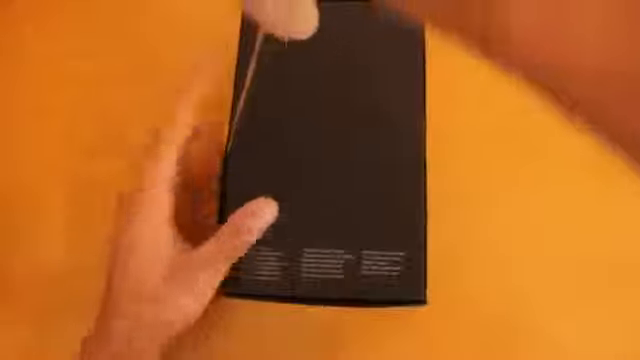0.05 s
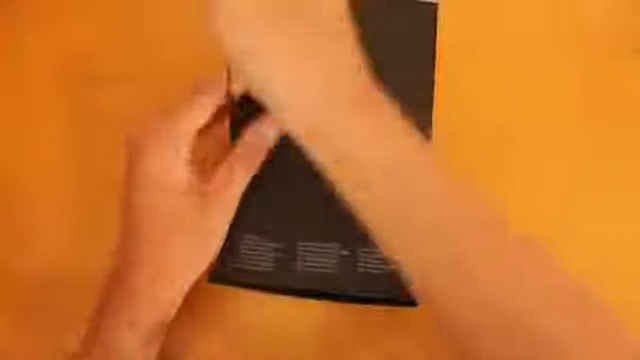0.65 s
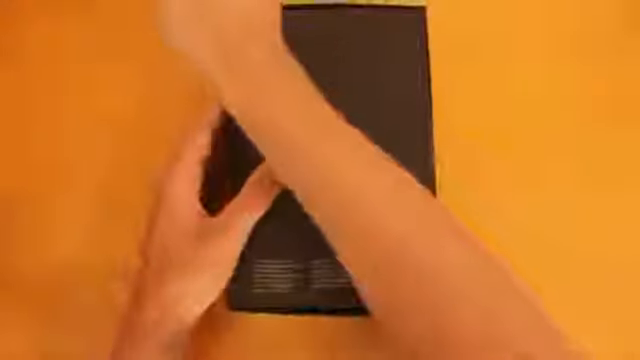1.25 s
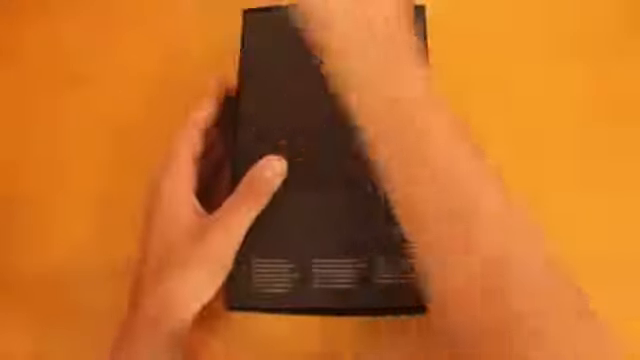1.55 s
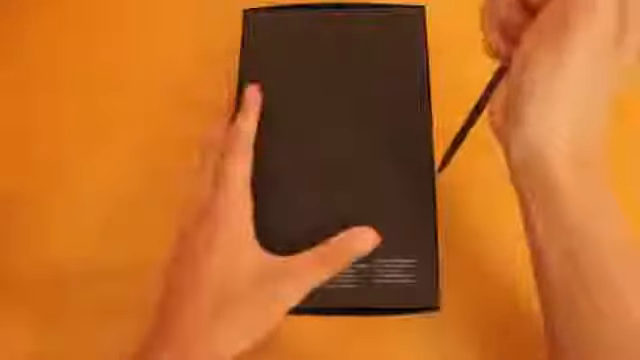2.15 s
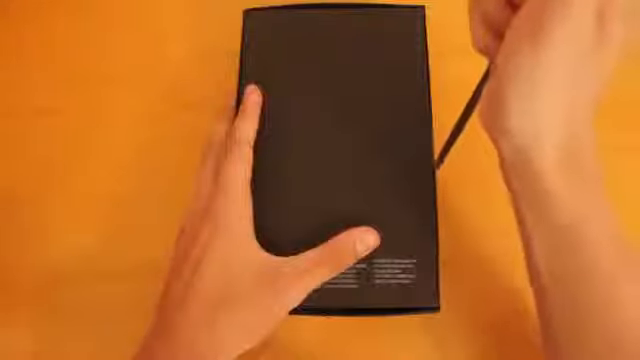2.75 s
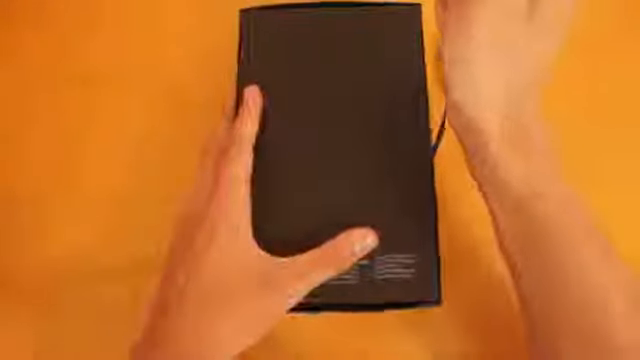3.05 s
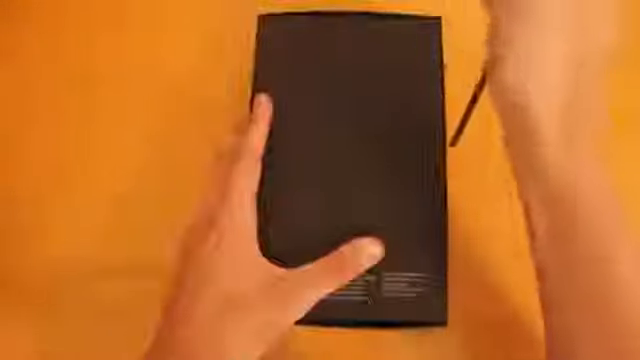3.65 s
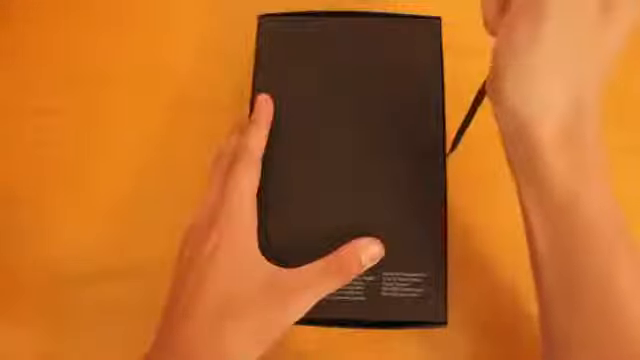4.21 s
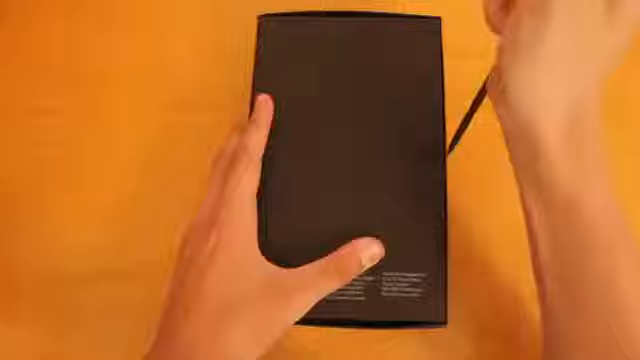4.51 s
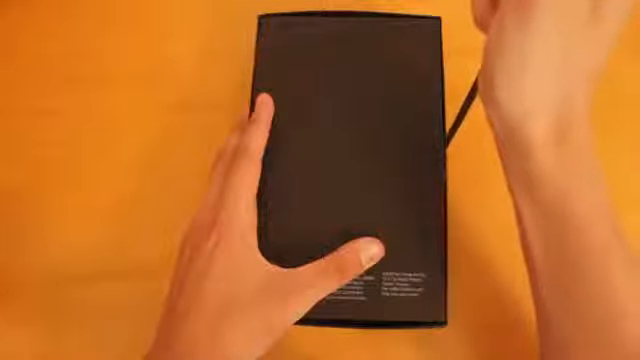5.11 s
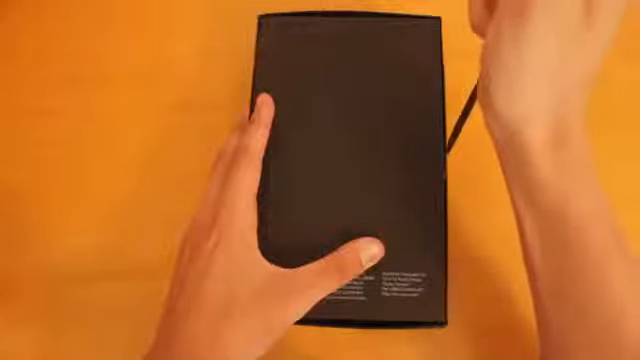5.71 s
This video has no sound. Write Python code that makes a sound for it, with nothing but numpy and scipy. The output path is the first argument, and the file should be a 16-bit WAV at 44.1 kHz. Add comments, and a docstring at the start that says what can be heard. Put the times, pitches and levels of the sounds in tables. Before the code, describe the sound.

A thin blade ticks and scrapes lightly along the tape of a cardboard box from the start, with soft hollow bumps and a low shuffle as hands push the box about. At about 1.3 seconds the taut tape parts with one sharp snap, the loudest sound. More ticks, short grainy scrapes and muffled bumps follow from 1.6 to 2.8 seconds. Around 3.2 seconds the box gives a brief squeak as it sticks and slips on the table. At 3.3 seconds a second strip of tape rips free, dragging the box in quick, thumping hops that die away by about 3.7 seconds. Faint scrapes and small bumps come between 3.9 and 5 seconds, then a last tick and hollow thump near 5.2 seconds. Everything is heard close up in a quiet small room with a short echo.

```python
"""In a quiet small room, a thin blade ticks and scrapes along the tape of a cardboard box.
Hands bump the hollow panels and push the box about, and the taut tape parts with one sharp snap.
Later the box squeaks as it sticks and slips on the table. A second strip of tape rips free and
drags the box along in quick, thumping hops. Two close microphones hear it all, with a short echo."""
import sys
import numpy as np
from scipy import signal
from scipy.fft import rfft, irfft
from scipy.io import wavfile

SR = 44100
rng = np.random.default_rng(int(sys.argv[2]) if len(sys.argv) > 2 else 0)


def transcribe(signal):
    """Save signal, clipped to [-1, 1], as a 16-bit WAV file at the path in sys.argv[1]."""
    frames = np.atleast_2d(signal).T
    limited = np.clip(frames, -1, 1)
    pcm = np.round(limited * 32767).astype(np.int16)
    wavfile.write(sys.argv[1], SR, pcm)


N = 254456
T = np.arange(N) / SR
SNAP_S = 1.2922
PANEL_PAN_DB = -5  # panel thumps are louder on the right


def undb(db):
    """Turn decibels into a gain to multiply by."""
    return 10 ** (np.asarray(db) / 20)


def unit(x):
    """Scale a sound to an average (rms) level of 1."""
    return x / np.sqrt(np.mean(x ** 2))


def fade(t60, size):
    """A gain that dies away by 60 dB in t60 seconds. Tables call this time ring_s."""
    return np.exp(-np.log(1000) * T[:size] / max(t60, 1e-4))


def colour(x, points, size=4096):
    """Shape the tone of a sound with rows of pitch_hz, level_db; white noise keeps its power."""
    hz, db = np.transpose(points)
    grid = np.maximum(np.fft.rfftfreq(size, 1 / SR), 1)
    log_gain = np.log(undb(np.interp(np.log(grid), np.log(hz), db)))
    # build the filter so that it never sounds ahead of its input
    first_half = (np.arange(size) > 0) & (np.arange(size) < size // 2)
    response = irfft(np.exp(rfft(2 * irfft(log_gain) * first_half)))
    return signal.fftconvolve(x, response / np.linalg.norm(response))[:len(x)]


def split(x, hz, order=2):
    """Return the parts of a sound below and above a frequency."""
    return [signal.sosfilt(signal.butter(order, hz, side, fs=SR, output="sos"), x)
            for side in ("low", "high")]


def ring(modes, size=12000):
    """A struck object rings with fading tones, one per row of pitch_hz, level_db, ring_s."""
    return sum(undb(db) * fade(t60, size) * np.sin(2 * np.pi * hz * T[:size]) for hz, db, t60 in modes)


def add(out, s, x, pan_db=0):
    """Mix a sound in at s seconds; pan_db is the left level minus the right."""
    i = max(int(s * SR), 0)
    out[:, i:i + len(x)] += undb(np.array([[pan_db], [-pan_db]]) / 2) * x[:N - i]


def gesture(s, db, rise, fall, hold=0):
    """A gain that peaks at time s, holds and dies away; rise and fall are seconds per 20 dB."""
    before = np.maximum(s - T, 0) / rise
    after = np.maximum(T - s - hold, 0) / fall
    return undb(db - 20 * np.minimum(before + after, 8))


def gestures(rows):
    """The joint gain of overlapping gestures, whose powers add."""
    return np.sqrt(sum(gesture(*row) ** 2 for row in rows))


def crackle(rate, spread_db, hiss):
    """Glue threads or fibres let go: about rate uneven clicks a second, over a smooth rub."""
    strength = undb(spread_db * np.clip(rng.standard_normal(N), -2, 2)) * rng.choice([-1, 1], N)
    clicks = unit(strength * (rng.random(N) < rate / SR))
    return unit(clicks + hiss * rng.standard_normal(N))


def room_air():
    """Quiet room air with a faint wavering hum, and the hiss of each microphone."""
    # tone of the air and hiss: pitch_hz, level_db
    air_tone = [(20, -5.5), (40, -7), (70, -5.5), (110, -2), (160, -7), (240, -6), (330, -10.5),
                (500, -11.5), (800, -17), (1400, -20), (2200, -22.5), (5000, -25.5), (10000, -28),
                (15000, -30)]
    shared, left, right = (colour(rng.standard_normal(N), air_tone) for _ in range(3))
    air = undb(-5.5) * split(shared, 1500, order=1)[0] + undb(-1) * np.array([left, right])
    hum = unit(signal.fftconvolve(rng.standard_normal(N), ring([(241, 0, .4)]))[:N])
    return undb(-63) * air + undb(-75) * hum


def blade_ticks(size=4096):
    """Each catch of the blade is a short crack that knocks the flap, with a crumbling tail."""
    # catches of the blade: start_s, strength_db, treble_db
    catches = [(0.015, -41, 21), (0.081, -33.5, 32.5), (0.378, -23, 11), (0.712, -28, -10.5),
               (0.732, -30, -8), (0.808, -20, -6), (0.822, -23.5, -12), (0.865, -20, 6), (1.196, -25, 6),
               (1.586, -17, 2.5), (1.877, -22.5, 9), (1.909, -28.5, -5), (2.021, -21.5, 9.5),
               (2.105, -23, 3), (2.15, -24, 6), (2.473, -33, -4), (2.729, -25.5, -15), (2.758, -18, -0.5),
               (3.335, -18.5, -16), (3.413, -19.5, -1), (3.472, -17, -11), (4.686, -36, -3),
               (5.239, -26, -8)]
    # tone of a tick: pitch_hz, level_db
    tick_tone = [(120, -36.5), (200, -1.5), (804, -3), (1460, -11), (1910, -12), (2510, -25.5), (2850, -20),
                 (4720, -26), (6190, -26.5), (7970, -31.5), (12500, -32.5), (15000, -40.5)]
    # tones of the stiff flap under the blade: pitch_hz, level_db, ring_s
    flap_tones = [(930, 0, .022), (1230, -5, .016)]
    # the blade's place as it crosses between seams: time_s, left_minus_right_db
    blade_path = [(1.6, -3), (1.85, 0.7)]
    out = np.zeros((2, N))
    flap = ring(flap_tones, size)
    knock = undb(-9.5) * flap / np.linalg.norm(flap)
    for s, db, treble_db in catches:
        crumbs = rng.standard_normal(size) * (fade(0.066, size) + undb(-15.5) * fade(0.14, size))
        crack = undb(-5) * signal.unit_impulse(size) + crumbs / np.linalg.norm(crumbs)
        low, high = split(colour(crack, tick_tone), 2500, order=1)
        tick = low + undb(treble_db) * high * fade(.07, size) + knock  # the treble dies first
        pan_db = np.interp(s, *np.transpose(blade_path))
        add(out, s, undb(db) * tick / np.linalg.norm(tick), pan_db)
    return out


def panel_thump(hz, t60):
    """A pushed panel swings, with a weaker overtone; the air inside swings against it. Peak 1."""
    # tone of the air in the box: pitch_hz, level_db, ring_s
    box_air = [(253.7, -12, 0.1)]
    swing = ring(box_air) - ring([(hz, 0, t60), (hz * 1.7, -14, .038)])
    muffled = split(swing, 420, order=3)[0]
    thump = split(muffled, 69)[1]
    return thump / abs(thump).max()


def hand_bumps():
    """Fingers and blade bump the hollow panels; the pitch depends on the grip."""
    # soft bumps: start_s, peak_db, pitch_hz
    bumps = [(0.016, -43, 119), (0.082, -43.5, 93), (0.34, -52, 141), (0.745, -42, 131.6),
             (0.921, -49, 117), (1.197, -45.5, 254.6), (1.584, -43.5, 241), (1.875, -47.5, 150.3),
             (2.023, -51, 242.4), (2.102, -50, 226), (2.156, -36.5, 111.2), (2.731, -31.5, 127),
             (2.756, -39, 243), (3.191, -38, 197), (3.305, -36, 132), (4.504, -51.5, 107),
             (4.798, -44, 163), (5.242, -31.5, 131)]
    out = np.zeros((2, N))
    for s, db, hz in bumps:
        add(out, s, undb(db) * panel_thump(hz, t60=.072), PANEL_PAN_DB)
    return out


def blade_scrape():
    """The blade drags through the tape in short, grainy strokes."""
    # strokes of the blade: peak_s, level_db, rise_s, fall_s
    strokes = [(0.085, -57.5, .018, 0.025), (0.124, -57.5, 0.036, 0.06), (0.378, -59.5, 0.087, 0.15),
               (0.712, -65.5, .07, 0.49), (0.814, -48.5, .018, .09), (0.868, -54.5, .04, 0.12),
               (1.15, -60, 0.061, 0.14), (1.285, -56, 0.38, 0.38), (1.58, -53.5, .28, .07),
               (1.66, -68, 0.11, 0.36), (1.879, -58, 0.025, 0.065), (2.025, -65, 0.014, .12),
               (2.152, -65, 0.069, .07), (2.33, -64.5, .11, .056), (3.93, -71, 0.068, .1),
               (4.52, -67, .05, .05), (4.692, -67, .05, 0.047), (4.815, -66.5, .04, 0.18),
               (5.015, -65, 0.14, 0.072)]
    # tone of the scraping: pitch_hz, level_db
    scrape_tone = [(90, -29.5), (200, -6), (350, -11.5), (500, -7), (680, -11), (1000, -8.5), (1500, -14.5),
                   (2400, -17.5), (3600, -17.5), (5200, -16.5), (8200, -20.5), (9500, -16.5), (12500, -23),
                   (15000, -35.5)]
    grain = colour(crackle(rate=2200, spread_db=5.5, hiss=0.82), scrape_tone)
    return grain * gestures(strokes)


def box_shuffle():
    """The hollow box rumbles as it is pushed, and moving arms stir the air at each microphone."""
    # pushes on the box: peak_s, level_db, rise_s, fall_s
    pushes = [(0.1, -58, .15, .15), (0.39, -60, .06, 0.24), (0.79, -58, 0.21, 0.37),
              (1.42, -52.5, .35, 0.35), (2.95, -55, 0.065, 0.21), (3.42, -51, .1, 0.38),
              (3.56, -60, .1, 0.13)]
    rumble_tone = [(15, -17), (30, -5), (75, -1), (130, 0), (230, 0),
                   (350, -13), (600, -18.5), (2000, -52)]  # pitch_hz, level_db
    rumble = colour(rng.standard_normal(N), rumble_tone)
    draught = unit(split(rng.standard_normal((2, N)), 45)[0])
    return (rumble + undb(-9) * draught) * gestures(pushes)


def tape_snap(snap_db=-8.5, size=12000):
    """The taut tape parts: a crack, and the lid springs back and rings."""
    # tone of the crack: pitch_hz, level_db
    crack_tone = [(100, -24), (300, -6.5), (700, -9), (1200, -6.5), (2000, -9.5), (2800, -15), (3700, -6),
                  (4700, -3.5), (6500, -6), (9000, -8), (12000, -10), (15000, -16.5)]
    # tones of the ringing lid: pitch_hz, level_db, ring_s
    lid_tones = [(229.8, -7, .042), (300, -6.5, 0.027), (490, -9, 0.037), (933, -18, 0.031),
                 (1330, 0.5, 0.0063), (2010, -5.5, 0.014), (3720, -9.5, 0.015), (4540, -0.5, 0.0047),
                 (6570, -7.5, 0.0024), (7320, -0.5, 0.001), (11596, -8, 0.0034)]
    out = np.zeros((2, N))
    crack = rng.standard_normal(size) * (fade(0.0099, size) + undb(-8) * fade(0.03, size))
    add(out, SNAP_S + .0003, undb(snap_db - 3.5) * colour(crack, crack_tone), pan_db=-0.26)
    for k, (hz, db, t60) in enumerate(lid_tones):
        travel_s = 0.00092 * (hz / 1000) ** -.5  # high tones cross the card first
        direction = -(-1) ** k  # neighbouring tones swing opposite ways
        add(out, SNAP_S + travel_s, direction * ring([(hz, snap_db + db, t60)]), pan_db=-4)
    return split(out, 70, order=1)[1]  # the small lid gives off little bass


def snap_at_walls():
    """The walls hear every side of the box at once, so the snap reaches them as one smooth pulse."""
    # tone of the snap, summed over all directions: pitch_hz, level_db
    pulse_tone = [(60, -22), (150, -5.5), (250, 4.5), (370, -3), (490, 2), (760, -9), (950, -1.5),
                  (1350, -3.5), (2000, -8.5), (2800, -10.5), (4600, -3), (7000, -7.5), (11000, -10.5),
                  (15000, -23)]
    return undb(10) * colour(signal.unit_impulse(N, int(SNAP_S * SR)), pulse_tone)


def box_squeak():
    """Cardboard sticks and slips on the table; each slip rings the panels, and the fibres rub."""
    # course of the squeak: time_s, slips_per_s, level_db
    course = [(3.19, 215, -47.5), (3.196, 224, -40.5), (3.212, 270, -42.5), (3.232, 243, -45.5),
              (3.247, 245, -51.5), (3.28, 255, -58.5)]
    # tones of the panels: pitch_hz, level_db, ring_s
    panel_tones = [(260, 2.5, 0.046), (501, 8, 0.053), (1004, 2, 0.02), (1570, -3.5, 0.013),
                   (2100, 3.5, 0.0044)]
    # tone of the box's side walls: pitch_hz, level_db, ring_s
    side_wall = [(509.6, 1, 0.16)]
    s, hz, db = np.transpose(course)
    slip_count = np.floor(np.cumsum(np.interp(T, s, hz)) / SR)
    slips = np.diff(slip_count, prepend=0) * undb(7.1 * np.clip(rng.standard_normal(N), -1, 1))
    panels = unit(split(signal.fftconvolve(slips, ring(panel_tones))[:N], 1740)[0])
    # pitch_hz, level_db
    rub_tone = [(200, 3), (1000, -2.5), (2200, -24), (3500, -24), (7000, -26), (14000, -28)]
    rub = colour(crackle(rate=2000, spread_db=-3, hiss=0.57), rub_tone)
    push = undb(np.interp(T, s, db, left=-np.inf, right=-np.inf))
    # the side walls swing towards one microphone and away from the other
    sideways = undb(-4) * signal.fftconvolve(slips * push, ring(side_wall))[:N]
    return (undb(4.5) * panels + undb(-1.5) * rub) * push + sideways * np.array([[1], [-1]])


def box_judder(start_s=3.331, hop_s=.0392, count=9):
    """The dragged box hops from edge to edge; each landing thumps a panel and shakes the table."""
    # tone of the table top: pitch_hz, level_db, ring_s
    table_top = [(62, -41, 0.073)]
    edge_hz = (240.4, 173)  # each edge thumps at its own pitch
    sag_db_per_s, stop_db_per_s, pull_s = 33, 135, 0.21  # hops weaken faster once the pull ends
    out = np.zeros((2, N))
    for k, chance in enumerate(rng.uniform(-1, 1, count)):
        age = k * hop_s
        db = -25 - sag_db_per_s * age - stop_db_per_s * max(age - pull_s, 0)
        hz = edge_hz[k % 2] * (1 + 0.053 * chance)
        thump = panel_thump(hz, t60=0.061)  # dragging shortens the ring
        add(out, start_s + age, undb(db) * thump, PANEL_PAN_DB)
        add(out, start_s + age, np.sin(np.pi * k / count) * ring(table_top))
    return out


def tape_rip(start_s=3.333, rise_s=0.0028, fall_s=0.031):
    """A strip tears free and its end slides off: the glue hisses, and each tug makes the card roar."""
    # tone of the rip: pitch_hz, level_db
    rip_tone = [(60, -21.5), (120, -8), (240, 2), (380, -12.5), (540, -4.5), (760, -15), (980, -12.5),
                (1200, -18.5), (1900, -17.5), (3200, -26.5), (5000, -23.5), (8000, -26), (12000, -24.5),
                (15000, -39)]
    # tugs on the card: peak_s, level_db
    tugs = [(3.336, -23.5), (3.379, -30.5), (3.417, -30), (3.473, -44)]
    glue = colour(crackle(rate=2500, spread_db=3.5, hiss=0.6), rip_tone)
    roar, hiss = split(glue, 1800, order=1)
    tearing = gesture(start_s, db=-36.5, rise=rise_s, fall=fall_s, hold=0.081)
    sliding = gesture(start_s, db=-53, rise=rise_s, fall=fall_s, hold=0.22)
    running = np.hypot(tearing, sliding)
    tugging = gestures([(s, db, 0.0057, 0.028) for s, db in tugs])
    return hiss * running + roar * np.hypot(tugging, undb(-5) * running)


def room_echo(x, early_db=-8, late_db=-11, low_t60=.3, high_t60=.21, size=24000):
    """Quick echoes from table and arms, then the walls; only the bass is alike left and right."""
    def echoes(early_gain, late_gain):
        early = unit(rng.standard_normal(size) * fade(0.021, size) * (T[:size] > .002))
        low, high = split(rng.standard_normal(size) * (T[:size] > .007), 1200, order=1)
        late = unit(low * fade(low_t60, size) + high * fade(high_t60, size))
        return signal.fftconvolve(x, early_gain * early + late_gain * late)[:N] / np.sqrt(size)
    middle = echoes(undb(early_db), undb(late_db))
    side = split(echoes(.7 * undb(early_db), .6 * undb(late_db)), 200, order=1)[1]
    return middle + side * np.array([[1], [-1]])


def scene():
    """All the work on the box, heard close up and through the room."""
    handling = blade_ticks() + hand_bumps() + box_judder() + blade_scrape()
    handling = handling + tape_rip() + box_shuffle() + box_squeak()
    carried = split(handling.mean(axis=0), 170)[1]  # the panels' deep swing is heard only close by
    echo = room_echo(carried + snap_at_walls())
    left, right = handling + tape_snap()
    lag_s = 3e-5  # the right microphone hears the box a little later
    hz = np.maximum(np.fft.rfftfreq(N, 1 / SR), 1)
    right = irfft(rfft(right) * np.exp(-2j * np.pi * hz * lag_s), N)
    return np.array([left, right]) + echo + room_air()


def record(dry):
    """The inputs sit slightly off zero, round off the highest peak and cut the very top of the treble."""
    # resting value of each input, left then right: offset (1 is full scale)
    offsets = [
        [.0002],
        [-.003],
    ]
    ceiling, top_hz = .95, 15200
    rounded = ceiling * np.tanh((dry + np.array(offsets)) / ceiling)
    return signal.sosfilt(signal.ellip(10, .2, 70, top_hz, fs=SR, output="sos"), rounded)


dry = scene()
out = record(dry)
transcribe(out)
```